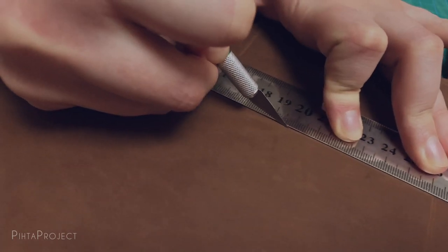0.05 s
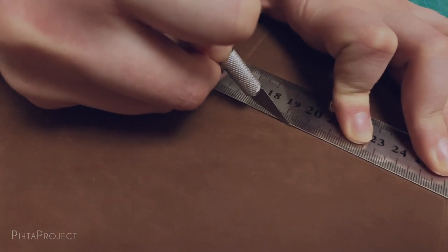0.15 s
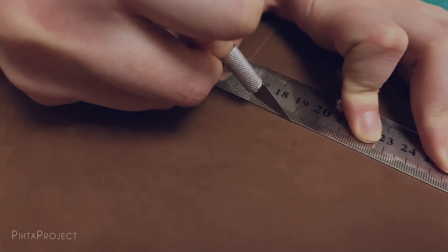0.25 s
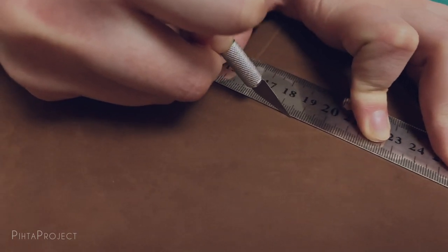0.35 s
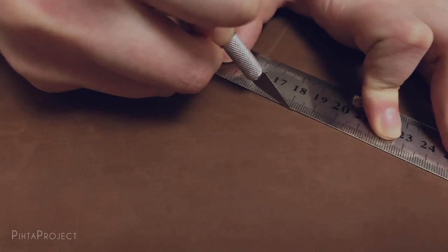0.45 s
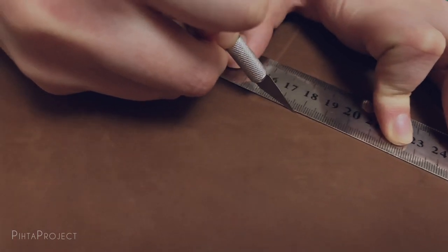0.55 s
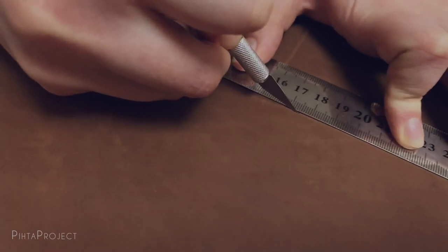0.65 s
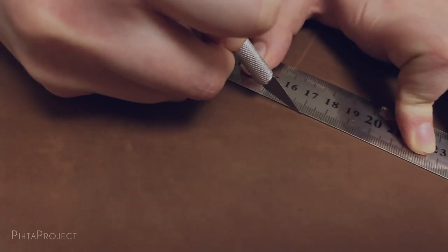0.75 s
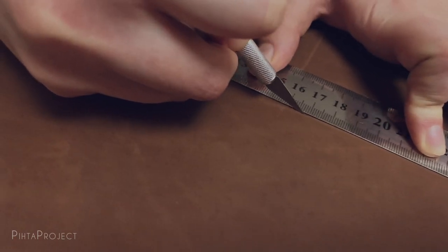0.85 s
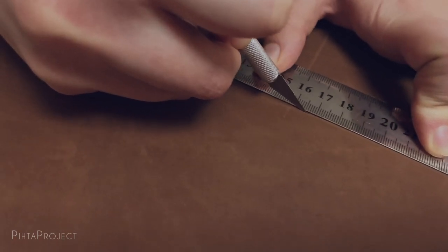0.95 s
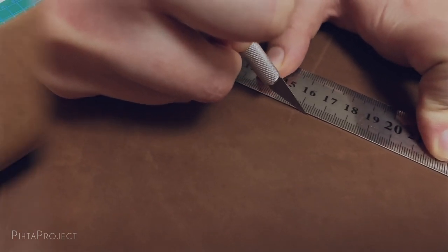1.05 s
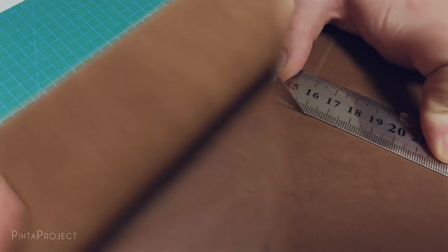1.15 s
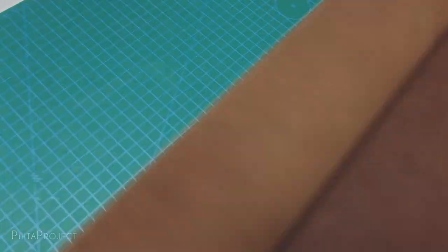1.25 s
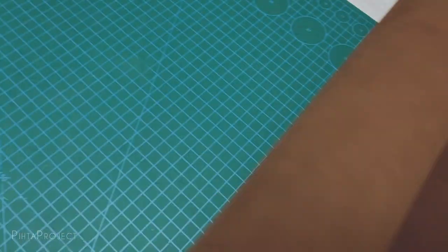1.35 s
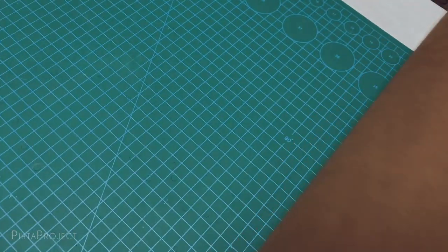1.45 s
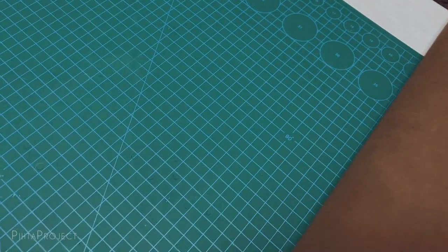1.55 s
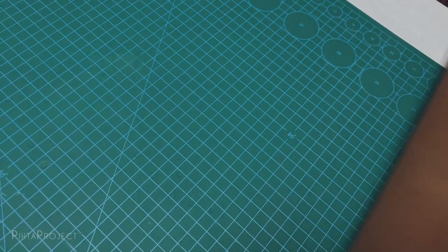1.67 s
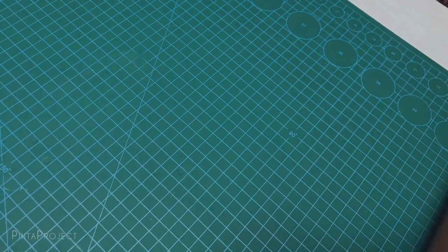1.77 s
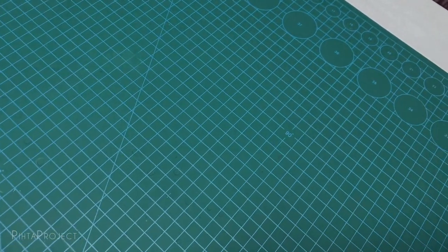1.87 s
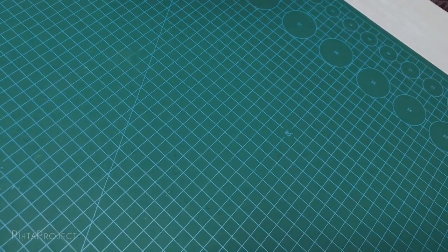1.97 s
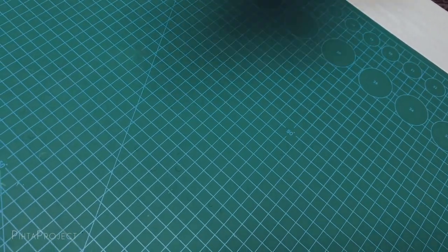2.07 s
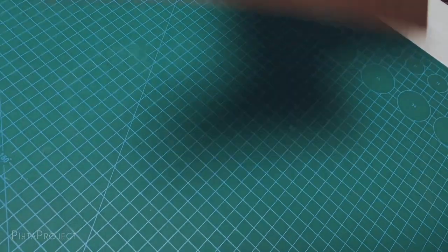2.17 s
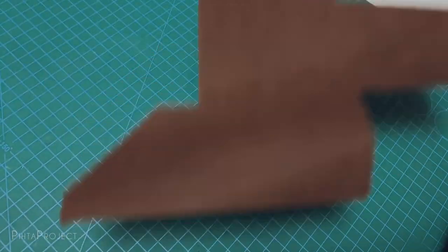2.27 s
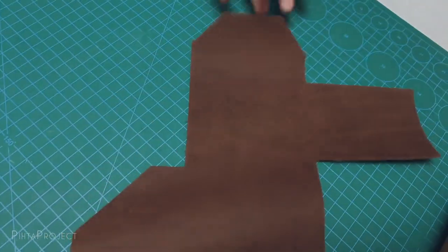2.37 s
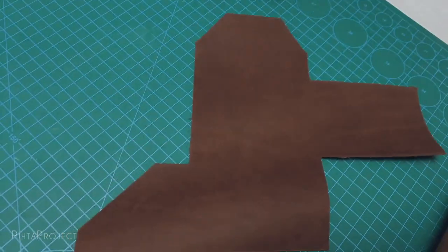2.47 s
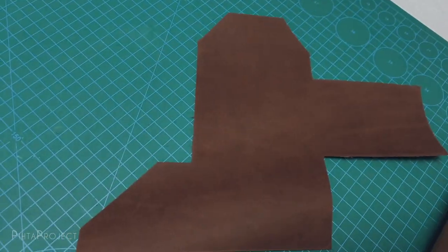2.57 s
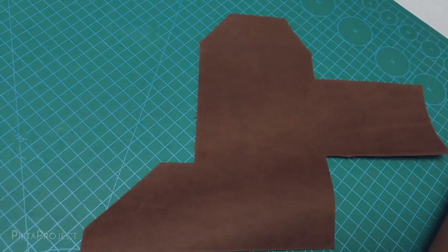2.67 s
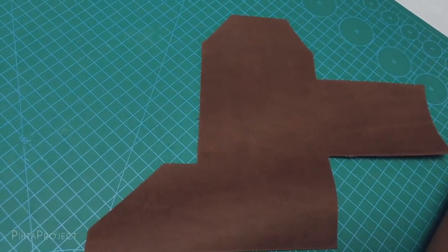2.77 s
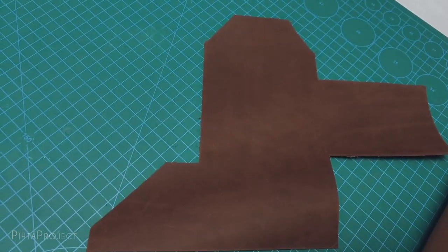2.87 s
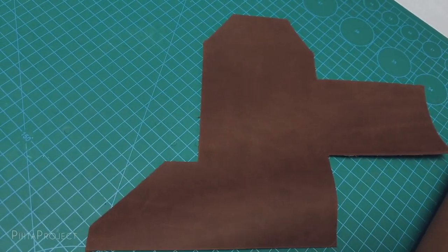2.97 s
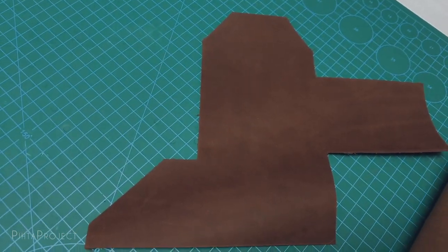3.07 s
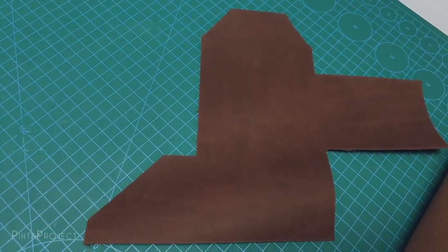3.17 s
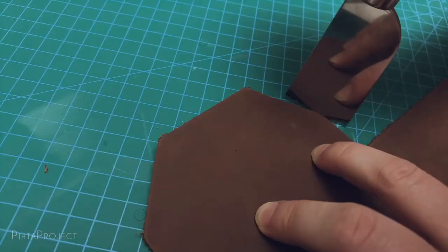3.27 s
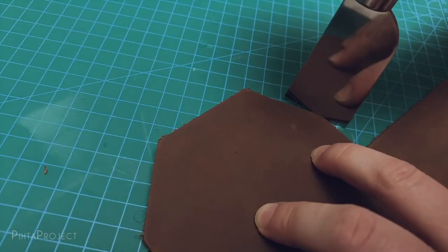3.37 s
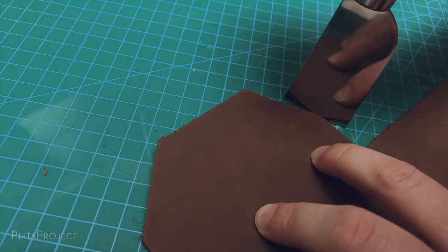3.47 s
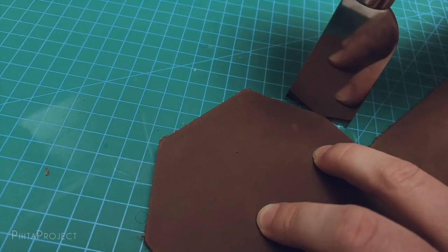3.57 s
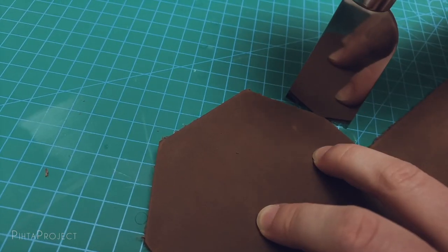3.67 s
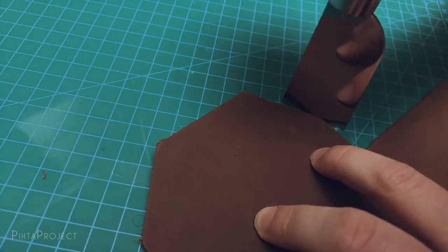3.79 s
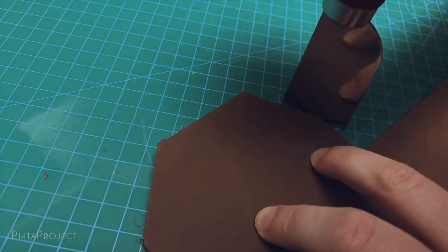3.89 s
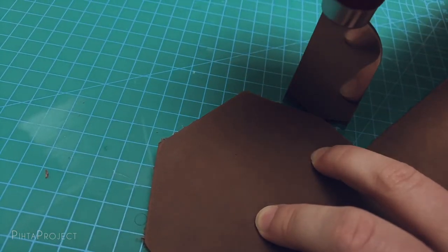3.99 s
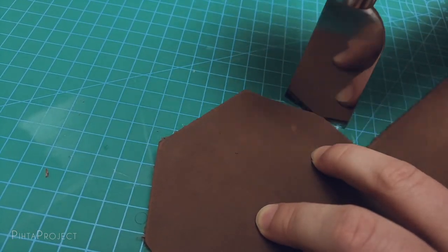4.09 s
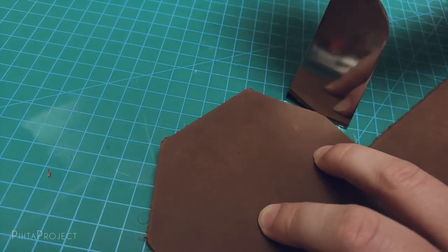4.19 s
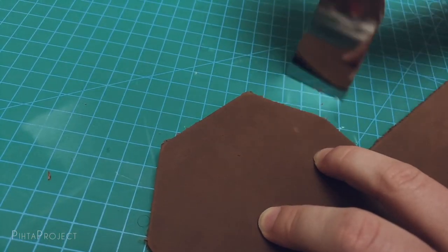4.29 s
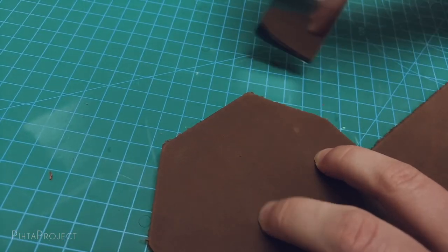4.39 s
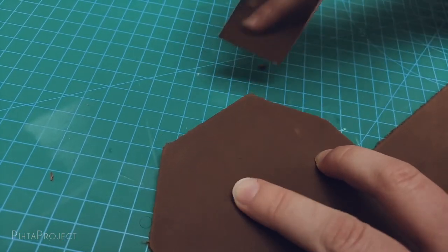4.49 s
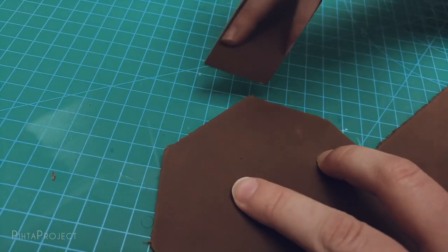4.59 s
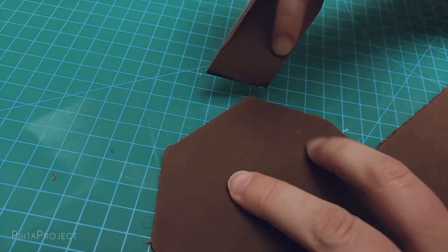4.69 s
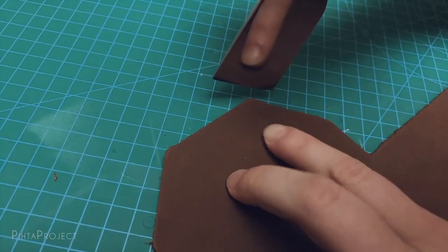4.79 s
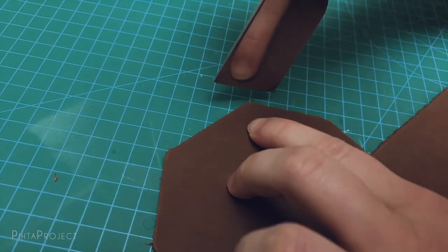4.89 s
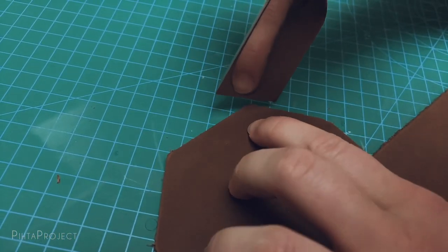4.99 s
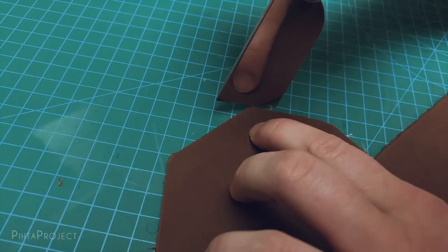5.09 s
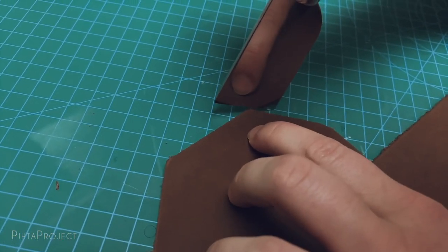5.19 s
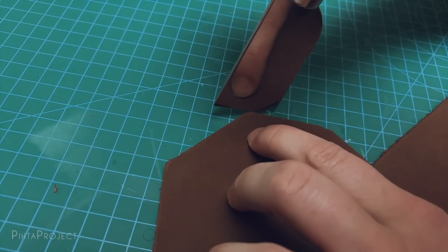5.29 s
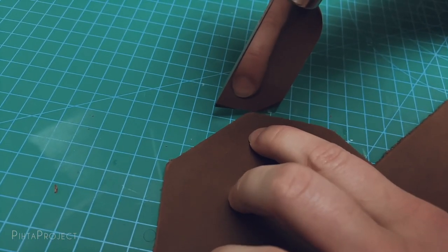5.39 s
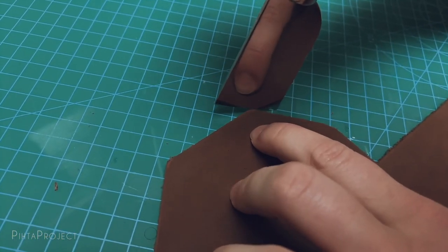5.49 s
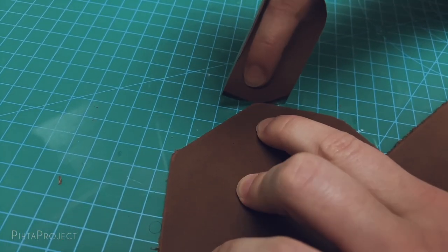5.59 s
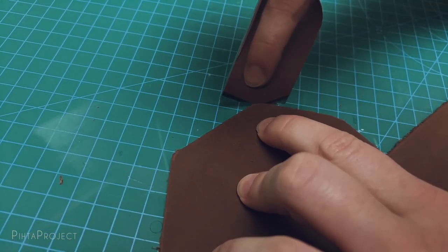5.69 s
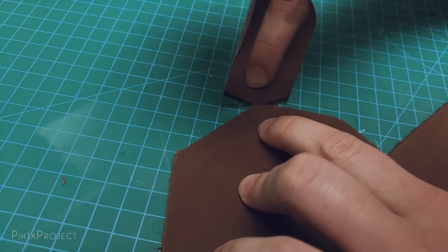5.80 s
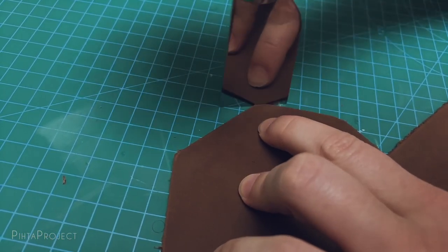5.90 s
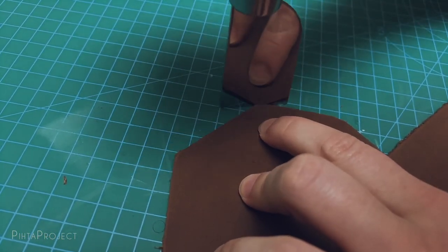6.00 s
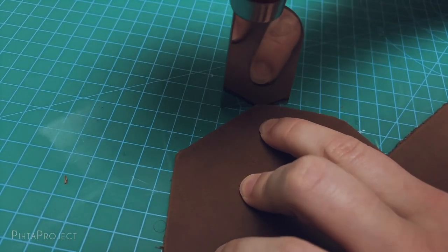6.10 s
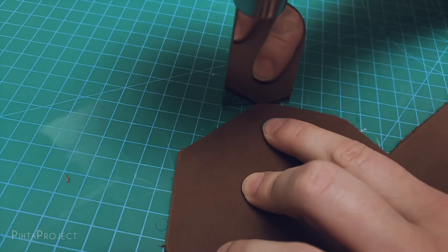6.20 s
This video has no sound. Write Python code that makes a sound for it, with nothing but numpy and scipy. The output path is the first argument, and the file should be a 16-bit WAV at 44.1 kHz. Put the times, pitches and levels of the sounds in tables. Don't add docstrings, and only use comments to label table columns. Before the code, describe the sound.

A knife scrapes grittily along a steel ruler through leather with tiny snaps, then leather flaps and drops on a mat, followed by short blade scrapes and finger rubs.

```python
import sys
import numpy as np
from scipy import signal
from scipy.fft import rfft, irfft
from scipy.io import wavfile
from scipy.ndimage import uniform_filter1d

SR = 44100
rng = np.random.default_rng(int(sys.argv[2]) if len(sys.argv) > 2 else 0)


def log_audio(samples):
    frames = np.atleast_2d(samples).T
    limited = np.clip(frames, -1, 1)
    pcm = np.round(limited * 32767).astype(np.int16)
    wavfile.write(sys.argv[1], SR, pcm)


def elevation(decibels):
    levels = np.asarray(decibels, float)
    return 10 ** (levels / 20)


N = 275625
T = np.arange(N) / SR


def evened(x):
    return x / np.sqrt(np.mean(x ** 2) + 1e-20)


def read(points, hz):
    f, value = np.transpose(points)
    return np.interp(np.log(hz + 1), np.log(f + 1), value)


def coloured(x, points):
    hz = np.fft.rfftfreq(len(x), 1 / SR)
    return evened(irfft(rfft(x) * elevation(read(points, hz)), len(x)))


def resonate(x, hz, width):
    turn = np.exp(2j * np.pi * np.cumsum(hz * np.ones(len(x))) / SR)
    r = np.exp(-np.pi * width / SR)
    return 2 * (turn * signal.lfilter([1 - r], [1, -r], x / turn)).real


def treble(x, hz):
    return signal.sosfilt(signal.butter(2, hz, "high", fs=SR, output="sos"), x)


def padded(x, count=4000):
    return np.pad(x, (0, count))


def columns(rows):
    s, *rest = np.transpose(rows)
    t = np.arange(s[0], s[-1], 1 / SR)
    return s[0], [np.interp(t, s, c) for c in rest]


def mixed(sounds):
    track = np.zeros(N)
    for s, sound in sounds:
        part = track[round(s * SR):][:len(sound)]
        part += sound[:len(part)]
    return track


def grit(count, per_s, spread_db, judder_db):
    hit, size, sign, grip = rng.random((SR, 4))[:count].T
    slips = (hit < per_s / SR) * elevation(-spread_db * np.log(size + 0.00088)) * np.sign(sign - 0.5)
    grip = uniform_filter1d(uniform_filter1d(grip - 0.5, size=300), size=200)
    return evened(slips * elevation(judder_db * evened(grip)))


def stray(count, share):
    every_s = 0.0698
    return 1 + share * np.interp(np.arange(count) / SR / every_s, np.arange(40), rng.standard_normal(40))


# t/s, extra force/dB
CATCHES = [(.004, 4.5), (.024, -0.5), (0.064, 4.5), (.08, 4), (.108, 4), (0.132, 11), (.149, 7), (0.169, 9),
           (.195, 5), (.221, 3), (0.228, 6), (.245, 3), (.266, 0), (0.287, 7), (.3, 5), (.345, 5),
           (.356, 4), (0.369, 6), (.388, 6), (.486, 5), (.498, 4.5), (.54, 6), (.553, 6.5), (0.57, -2),
           (.606, 5.5), (0.658, 5.5), (.676, 1), (.692, 1), (0.726, 7), (0.755, 5), (.785, -3), (.834, 10),
           (.875, 7), (.913, 3), (0.96, 11), (.98, 5), (1.006, 8), (1.03, 3), (1.088, 5), (1.106, 10),
           (1.154, 4), (3.687, 4.5), (3.71, 2.5), (3.72, -5), (3.729, -1.5), (3.735, 4), (3.762, 4),
           (4.217, -2), (4.227, 2), (4.248, 2), (4.258, -1), (5.82, 4), (5.83, -1), (5.838, 2.5),
           (5.851, 4), (5.859, 4.5), (5.877, 4), (5.888, 3.5), (5.904, 2.5)]


def catches():
    half_s = 0.0025
    return sum(db * np.exp(-((T - s) / half_s) ** 2) for s, db in CATCHES)


def scrape(rows, colour, modes, per_s, spread_db, judder_db, ring_db, wander=0):
    stiff_hz = 2600
    s, (level_db, hiss_db) = columns(rows)
    surge = catches()[round(s * SR):][:len(level_db)]
    level_db = level_db + surge
    hiss_db = hiss_db + 0.37 * surge
    force = grit(len(level_db), per_s, spread_db, judder_db)
    force = force + (elevation(hiss_db) - 1) * treble(force, hz=5600)
    force = padded(force * elevation(level_db) * signal.windows.tukey(len(force), 300 / len(force)))
    rings = 0
    for mode_hz, width, db in modes:
        hz = mode_hz * stray(len(force), wander * min(1, stiff_hz / mode_hz))
        rings = rings + elevation(db) * resonate(resonate(force, hz, width), hz, 3 * width)
    sound = coloured(force, colour) + elevation(ring_db) * evened(rings)
    return s, evened(sound) * np.sqrt(np.mean(padded(elevation(level_db)) ** 2))


# t/s, pressure/dB
DRAG = [(0, -49), (.15, -50), (.32, -48.5), (.4, -44.5), (.5, -47), (.53, -54.5), (.56, -46.5), (.72, -48),
        (.82, -53), (.9, -53), (.945, -60), (1.0, -55.5), (1.18, -55)]
HISS_FROM_DB = -48


def grip_curve(later):
    regrip_s, span_s, end_s = 0.53, 0.12, DRAG[-1][0]
    s = np.arange(regrip_s - span_s, end_s, 1 / 200) if later else np.arange(0, regrip_s + span_s, 1 / 200)
    db = np.interp(s, *np.transpose(DRAG))
    share = np.clip(0.5 + (s - regrip_s) / (2 * span_s), 0, 1)
    share = share if later else 1 - share
    hiss_db = np.maximum(db - HISS_FROM_DB, -7)
    return list(zip(s, db + 10 * np.log10(share + 1 / 1000), hiss_db))


# f/Hz, density/dB
DRAG_COLOUR = [(200, -22), (400, 3.5), (1000, 3.5), (2500, -2), (4000, -40), (7000, -37), (7600, -38),
               (10000, -28), (10700, -54), (15500, -60)]
# f/Hz, width/Hz, level/dB
RULER = [
    [(600, 43, 4.5), (1366, 125, 2.5), (1810, 350, -2.5), (2164, 260, 2.5), (2760, 480, -6),
     (3300, 470, -12), (3670, 240, -9), (4480, 380, -13), (5540, 320, -18), (6250, 450, -20.5),
     (8530, 590, -23), (9700, 440, -23)],
    [(620, 62, 12), (1300, 230, -8), (1850, 370, 2), (2800, 710, 2), (3360, 250, -13), (3830, 200, -11.5),
     (4800, 330, -8.5), (5500, 220, -20), (6500, 450, -16), (7600, 600, -15), (8500, 700, -13),
     (9650, 400, -14)],
]


def knife_drag():
    return mixed(scrape(grip_curve(later), DRAG_COLOUR, modes, per_s=6500, spread_db=3.0,
                        judder_db=1.1, ring_db=0, wander=0.035) for later, modes in enumerate(RULER))


def rumble():
    s, (db,) = columns(DRAG)
    spectrum = [(40, -10), (90, 16), (140, 12.0), (260, 3), (500, -45)]  # f/Hz, density/dB
    shake = coloured(rng.standard_normal(2 * SR)[:len(db)], spectrum)
    return mixed([(s, elevation(-52 + 0.8 * (db - HISS_FROM_DB)) * shake)])


# from/s, to/s, room tone/dB, sources/dB
CHANGES = [
    (1.3195, 1.354, -3, -60),
    (3.3353, 3.3682, -31, -60),
]
# f/Hz, density/dB
AIR = [(12, -56), (20, -21), (44, -2.5), (65, 0), (88, -8.5), (261, -7), (300, -14.5), (335, -9),
       (482, -14), (712, -19.5), (774, -17.5), (1240, -22), (1430, -23), (11000, -40.5), (15800, -48)]
AIR_DB = [-53.5, -57, -57]
# t/s, width/s, level/dB
STIRS = [(1.75, 0.27, 2), (3.8, 0.15, 6), (4.8, 0.31, 2), (6.05, 0.18, 2)]


def air():
    db = np.array(AIR_DB)[np.searchsorted([row[0] for row in CHANGES], T)]
    db = db + sum(lift * np.exp(-((T - s) / width) ** 2) for s, width, lift in STIRS)
    return elevation(db) * coloured(rng.standard_normal(N), AIR)


# f/Hz, t60/s
ROOM = [(100, 0.45), (400, 0.32), (1500, 0.27), (4000, 0.15), (10000, 0.13)]


def room(x):
    taps = np.zeros(SR // 2)
    at = np.arange(200, len(taps) - 20, 20)
    taps[at + rng.integers(0, 20, len(at))] = rng.choice([-1., 1.], len(at))
    hz, t, z = signal.stft(taps, SR, nperseg=256)
    tail = signal.istft(z * elevation(-60 * t / read(ROOM, hz)[:, None]), SR, nperseg=256)[1]
    return signal.fftconvolve(x, tail / np.linalg.norm(tail))[:N]


# f/Hz, level/dB, t60/s
DESK = [(127.3, -9.5, 0.3), (267, -6, 0.033), (330, -4, 0.089), (497, -2, 0.033), (690, -9, .04),
        (980, -7, 0.07), (1300, -2, 0.044), (1613, -6, 0.065), (1936, -7, .05), (2504, -16, 0.042)]
TICK_RATIO = [
    2.34,
    1.56,
    2.26,
]
TICK_S = [
    0.00016,
    0.00021,
    0.00012,
]
STRIP, LIMP, STEEL = 0, 1, 2


def tap(thing, s, db, hz, t60, tick_db):
    t, tick_hz = np.arange(SR // 4) / SR, TICK_RATIO[thing] * hz
    turns = np.cumsum(hz * (0.83 + 0.5 * np.exp(-t / 0.0016))) / SR
    ring = np.sin(2 * np.pi * turns) * elevation(-60 * t / max(t60, 0.002)) * (1 - np.exp(-t / 0.00065))
    tick = np.sin(2 * np.pi * tick_hz * t) * np.exp(-(t / TICK_S[thing] - 2) ** 2)
    crackle = resonate(rng.standard_normal(len(t)), 0.23 * tick_hz, 1900)
    crackle = evened(resonate(crackle, 0.36 * tick_hz, 2700))
    crackle = elevation(tick_db - 7.0) * crackle * np.exp(-t / 0.0025)
    desk = 0
    for f, mode_db, mode_t60 in DESK:
        phase = rng.uniform(0, 2 * np.pi)
        desk = desk + elevation(mode_db - 60 * t / mode_t60) * np.sin(2 * np.pi * f * t + phase)
    desk = elevation(-14.5) * desk * (1 - np.exp(-t / 0.0019))
    return s, elevation(db) * (1.5 * ring + elevation(tick_db) * tick + crackle + desk)


# t/s, peak/dB
SNAPS = [(.0795, -49), (0.1318, -35), (.169, -43), (.229, -38), (0.265, -38), (.287, -39), (0.365, -40.5),
         (.4848, -43), (.5525, -40), (.606, -39), (0.6584, -35), (.692, -44), (.7262, -34), (.7535, -39),
         (.8335, -42), (.9123, -49), (0.958, -42), (1.0065, -51), (1.0875, -45), (1.106, -52),
         (1.1535, -52)]


def fibre_snaps():
    return mixed(tap(STEEL, s, db, hz=2300 * rng.uniform(0.84, 1.21), t60=0.0069, tick_db=-7)
                 for s, db in SNAPS)


# centre t/s, peak/dB, f/Hz, half length/s
CLAPS = [(1.0315, -56, 10000, .0001), (1.0918, -49, 9500, .00012), (1.1056, -51, 8500, .0001),
         (1.154, -53, 9500, .00012), (1.2165, -28, 790, 0.0011), (1.2846, -24.5, 3000, 0.00031),
         (2.3556, -23, 2700, .0005), (2.3614, -21.5, 2950, .0005), (2.3838, -28, 700, 0.00067),
         (2.3588, -20, 1530, .0011), (2.3602, -9.5, 1780, .0009), (2.367, -21.5, 600, 0.00095),
         (2.3704, -16.5, 1490, 0.00047), (3.735, -30, 1710, .001), (3.756, -37, 5500, .0004),
         (4.7955, -31, 3580, 0.00022), (4.9995, -45, 2000, .00018), (5.1094, -42, 1500, 0.00053),
         (5.851, -29, 1370, 0.0016), (5.8595, -25.5, 1900, 0.00071), (5.8775, -26, 1400, 0.001),
         (5.9045, -25, 1600, 0.00067)]


def clap(s, db, hz, half):
    t = np.arange(-3 * half, 3 * half, 1 / SR)
    return s + t[0], elevation(db) * np.exp(-(t / half) ** 2) * np.cos(2 * np.pi * hz * t)


def air_claps():
    return mixed(clap(*row) for row in CLAPS)


def thump(s, db, hz, t60):
    t = np.arange(SR // 2) / SR
    rise_s = 0.003 + 0.35 / hz
    shape = np.sin(np.pi / 2 * np.minimum(t / rise_s, 1)) ** 2 * elevation(-60 * t / t60)
    return s, elevation(db) * shape / shape.max() * np.sin(2 * np.pi * hz * t)


# t/s, peak/dB, f/Hz, t60/s
THUMPS = [(1.189, -34, 424, .06), (1.196, -27.5, 357, 0.05), (1.204, -31.5, 793, 0.045),
          (1.208, -14, 362, 0.03), (1.2255, -16.5, 300, 0.033), (1.251, -28, 270, 0.046),
          (1.287, -30, 510, .028), (1.387, -32.5, 215, 0.14), (1.608, -19.5, 456, 0.068),
          (1.611, -27, 722, 0.093), (1.613, -23.5, 592, 0.031), (1.615, -19, 245.3, 0.094),
          (1.624, -23, 242, 0.1), (1.655, -31, 233, .09), (1.705, -36.5, 247, 0.15),
          (1.759, -52, 242, 0.082), (1.775, -50, 428, 0.055), (1.875, -51.5, 890, 0.047),
          (2.07, -58.5, 329, 0.43), (2.359, -29.5, 187, 0.086), (2.36, -23, 980, 0.044),
          (2.362, -39.5, 334, 0.3), (2.363, -31, 407, 0.046), (3.63, -31.5, 330, .02),
          (3.644, -35, 380, 0.02), (3.633, -41, 190, 0.067), (3.716, -33, 482, 0.049),
          (3.757, -29.5, 490, 0.031), (4.255, -23.5, 593, 0.068), (4.268, -33, 818, 0.15),
          (4.28, -37, 567, 0.084), (5.1094, -28.5, 194, 0.044), (5.111, -34, 403, 0.016),
          (5.119, -38, 280, 0.04), (5.18, -40, 197, 0.056)]


def leather_thumps():
    return mixed(thump(*row) for row in THUMPS)


# start t/s, length/s, level/dB, from f/Hz, to f/Hz, width/Hz
WHIFFS = [
    (1.195, 0.052, -49.5, 5500, 8000, 5000),
    (1.223, 0.055, -56.5, 8500, 8000, 4200),
    (4.797, 0.068, -57.5, 5170, 4800, 3000),
    (1.796, 0.053, -50, 1500, 3700, 800),
    (1.8, .035, -61, 3300, 3470, 600),
    (1.84, 0.046, -54, 2100, 3200, 900),
]


def whiff(start, length, db, from_hz, to_hz, width):
    u = np.arange(0, 1, 1 / (length * SR))
    hz = from_hz + (to_hz - from_hz) * u
    band = resonate(resonate(grit(len(u), 12000, 1.1, 1.5), hz, width), hz, 1.6 * width)
    soft_top = signal.butter(2, 10400, fs=SR, output="sos")
    band = evened(treble(signal.sosfilt(soft_top, band), hz=0.3 * from_hz))
    return start, elevation(db) * np.sin(np.pi * u ** 0.76) ** 1.1 * band


def whiffs():
    return mixed(whiff(*row) for row in WHIFFS)


# f/Hz, density/dB
SLIDE_COLOUR = [(900, -21), (1500, 6), (2500, 1), (4500, -4.5), (7000, -14), (11000, -21.5), (15500, -34)]
# f/Hz, density/dB
FLOP_COLOUR = [(100, -7), (250, 1.5), (400, 4), (800, -8), (1200, -6.5), (2200, -21), (5000, -68)]


def slide(rows):
    s, (level_db, hz, fizz_db, flop_db) = columns(rows)
    force = grit(len(hz), 9000, 1.6, 1.0)
    sound = coloured(force, SLIDE_COLOUR) + 0.8 * evened(resonate(resonate(force, hz, 1300), hz, 2400))
    sound = evened(sound) + (elevation(fizz_db) - 1) * treble(sound, hz=4330)
    flop = elevation(flop_db - 2) * coloured(force[::-1], FLOP_COLOUR) * np.minimum(np.arange(len(hz)) / 500, 1)
    return s, (elevation(level_db) * sound + flop) * signal.windows.tukey(len(hz), 300 / len(hz))


# start t/s, length/s, level/dB, fizz/dB, flop
# over rub/dB
SETTLES = [(1.203, 0.047, -44.5, 3, 16.5), (1.292, .03, -54, 2, 15), (1.304, 0.075, -54, 3, 20),
           (1.3494, 0.0087, -50.5, 19.5, -8), (1.384, .13, -57, 0.5, 18.5), (1.63, 0.22, -48, 3.5, 8.5),
           (2.371, 0.2, -53.5, 0, 10.5), (3.768, .13, -54.5, 2.5, 6), (4.273, 0.12, -55.5, 5, 13),
           (4.804, .1, -52, 6, -3), (5.115, 0.075, -77.5, 0.5, 30), (5.913, 0.076, -50.5, 8.5, 6)]


def settle(start, length, db, fizz_db, flop_db):
    hz, fade_db, flop_fade_db = 2300, -18.5, -5.5
    return [(start, db, hz, fizz_db, db + flop_db),
            (start + length, db + fade_db, hz, fizz_db, db + flop_db + fade_db + flop_fade_db)]


def settling():
    return mixed(slide(settle(*row)) for row in SETTLES)


# t/s, peak/dB, ring f/Hz, ring t60/s, tick rel/dB
FLAPS = [(1.2707, -30, 795, 0.0085, -11), (1.2841, -20.5, 1646, 0.011, -3.5),
         (1.2863, -28, 1060, 0.017, -15), (1.391, -27.5, 875, 0.0064, -15),
         (1.6036, -23.5, 1450, 0.021, 1.5), (1.6103, -28, 1550, 0.0046, 9), (1.612, -17.5, 980, 0.016, -18),
         (1.6198, -21, 1230, 0.012, 5)]


def strip_flaps():
    return mixed(tap(STRIP, *row) for row in FLAPS)


def change_scene(close, tone):
    for start, end, tone_db, close_db in CHANGES:
        inside = (T > start) & (T < end)
        close = np.where(inside, close * elevation(close_db), close)
        tone = np.where(inside, (tone - 0.8 * treble(tone, hz=700)) * elevation(tone_db), tone)
    return close, tone


# t/s, level/dB, fall/s
POP = (1.3542, -25, .0005)


def pop():
    s, db, fall = POP
    t = T[:400]
    return mixed([(s, -elevation(db) * np.exp(-t / fall) * np.minimum(t / 0.00014, 1))])


# t/s, peak/dB, f/Hz, t60/s
SHUDDERS = [(1.354, -42, 69.6, .12), (1.624, -32.5, 120, 0.11), (2.37, -41, 41.3, 0.44),
            (3.72, -49, 35.5, 0.36), (3.73, -38.5, 170.3, 0.12), (3.901, -45.5, 107, 0.086),
            (4.26, -42, 97, 0.27), (4.289, -40.5, 240, 0.076), (4.27, -44, 40, 0.27),
            (4.808, -39.5, 58, 0.045), (5.125, -36, 46, 0.25), (5.91, -41, 57, 0.13),
            (6.0, -45.5, 35.8, 0.6)]


def desk_shudders():
    return mixed(thump(*row) for row in SHUDDERS)


def rub(start, length, db, fizz_db, flop_db, from_hz=2530, to_hz=2530):
    up_s, down_s, ends_db = 0.015, 0.016, -11
    s = np.array([0, up_s, max(length - down_s, up_s), length])
    level = db + ends_db * np.array([1, 0, 0, 1])
    hz = from_hz + (to_hz - from_hz) * np.minimum(s / s[2], 1)
    return list(zip(start + s, level, hz, fizz_db + 0 * s, level + flop_db))


# start t/s, length/s, level/dB, fizz/dB, flop over rub/dB
RUBS = [(1.4, 0.033, -66, 13, 5), (1.646, 0.082, -54, 5.5, -5), (2.2, .14, -66, 8.5, 1),
        (2.931, 0.097, -71.5, 8.5, -6), (3.886, 0.089, -60, 4.5, 1), (4.654, 0.045, -62, 11, 1),
        (4.67, 0.14, -56.5, -1.5, -6.5), (4.792, .11, -57, 6, -3), (3.626, .05, -62.5, 0, 13)]


def finger_rubs():
    return mixed(slide(rub(*row)) for row in RUBS)


def glide(s, length, db, from_hz, to_hz):
    return slide(rub(s, length, db, 2.5, -4.5, from_hz, to_hz))


# start t/s, length/s, level/dB, from f/Hz, to f/Hz
SWISHES = [
    (1.795, 0.051, -51, 1800, 3300),
    (1.842, .055, -54, 2300, 3120),
]


def swishes():
    return mixed(glide(*row) for row in SWISHES)


# t/s, peak/dB, ring f/Hz, ring t60/s, tick rel/dB
DROP = [(2.3215, -38, 970, 0.016, -25), (2.3495, -30.5, 1430, 0.025, -2), (2.3535, -23.5, 1900, 0.0082, 4),
        (2.3566, -26, 1480, 0.0076, -9), (2.3598, -17.5, 1490, 0.0031, -5),
        (2.3613, -32, 1210, 0.0084, -13), (2.3642, -27, 2920, 0.0044, 1.2), (2.3645, -22, 1300, 0.0093, -5),
        (2.3694, -25, 1650, 0.012, -3), (2.382, -34, 1160, 0.006, -15)]


def limp_drop():
    return mixed(tap(LIMP, *row) for row in DROP)


# t/s, peak/dB, ring f/Hz, ring t60/s, tick rel/dB
NICKS = [(3.629, -36, 1450, 0.0085, -14), (3.643, -37, 1500, 0.0068, -4), (3.663, -44, 1510, 0.012, -2),
         (3.6977, -31, 3300, 0.0077, -10), (3.756, -28, 2300, 0.0033, -9), (4.6697, -45, 1300, 0.0087, -2),
         (4.795, -38, 2800, 0.005, -7), (4.9990, -44.5, 1250, 0.0091, -1), (5.11, -38.5, 800, 0.0094, -22)]


def blade_nicks():
    return mixed(tap(STEEL, *row) for row in NICKS)


def stroke(start, dig, hold, db, hiss_db, dig_db=-18, ring_db=0):
    lift_s, lift_db = 0.015, -14
    s = start + np.cumsum([0, dig, hold, lift_s])
    return list(zip(s, db + np.array([dig_db, 0, 0, lift_db]), hiss_db + ring_db * np.array([0, 0, 0, 1])))


# start t/s, dig-in/s, hold/s, level/dB, steel hiss/dB
SKIVES_CUT = [
    (3.677, 0.05, 0.028, -32, -3),
    (5.819, 0.028, 0.055, -33.5, -5.5),
]
# f/Hz, density/dB
SKIVE_COLOUR = [(100, -13.5), (200, -6.5), (500, -9.5), (1500, -3.5), (2400, -12.5), (3500, -19),
                (5500, -26.5), (8000, -28), (11500, -36.5), (13500, -36), (15500, -44)]
# f/Hz, width/Hz, level/dB
MAT = [(483, 195, 7.5), (766, 115, 8), (1280, 460, -5), (1630, 160, -5), (1900, 190, -11),
       (2900, 500, -6.5), (3220, 120, -20), (5500, 240, -21), (7500, 380, -24), (12600, 200, -32)]


def skives():
    return mixed(scrape(stroke(*row), SKIVE_COLOUR, MAT, per_s=6000, spread_db=2.0, judder_db=-0.1,
                        ring_db=-3.0, wander=0.045) for row in SKIVES_CUT)


# start t/s, dig-in/s, hold/s, level/dB, steel hiss/dB
SKATE_CUT = (4.206, .042, .012, -28.5, 1)
# f/Hz, density/dB
SKATE_COLOUR = [(88, -53), (150, -12.5), (607, -28), (948, -17.5), (1730, -7), (2100, -15.5), (3220, -16.5),
                (8170, -30), (9360, -31), (14300, -43), (15500, -44)]
# f/Hz, width/Hz, level/dB
BLADE = [(600, 280, 1), (760, 46, -13), (1810, 140, 2), (3200, 370, -7.5), (3900, 190, -11), (4290, 62, -5),
         (6400, 200, -19), (8870, 130, -7), (9400, 89, -3.5), (9400, 360, -13), (10000, 350, -16),
         (13400, 300, -20), (14130, 110, -11), (14000, 640, -21)]


def skate():
    rows = stroke(*SKATE_CUT, dig_db=-11, ring_db=7)
    return mixed([scrape(rows, SKATE_COLOUR, BLADE, per_s=9000, spread_db=2.4, judder_db=0.6,
                         ring_db=-1, wander=0.0015)])


# t/s, peak/dB, f/Hz, t60/s
SINGS = [
    (4.262, -47, 9430, .11),
    (4.262, -58, 14130, .11),
]


def blade_sings():
    return mixed(thump(*row) for row in SINGS)


# start t/s, length/s, level/dB, from f/Hz, to f/Hz
SCUFFS = [
    (4.386, 0.072, -48.5, 2450, 2800),
    (6.201, .1, -55, 2930, 2600),
]


def scuffs():
    sounds = []
    for row in SCUFFS:
        s, sound = glide(*row)
        cut_hz = 0.75 * row[3]
        sounds.append((s, treble(treble(sound, cut_hz), cut_hz)))
    return mixed(sounds)


# start t/s, length/s, level/dB, fizz/dB, flop over rub/dB
DULL_RUBS = [(4.469, .19, -63, 2, 0.63), (4.9, 0.19, -64.5, 4, 5.5), (5.57, 0.21, -79, 3, 4.8),
             (5.93, .175, -58, 3.5, 2.6), (6.109, 0.092, -68, -5, 3)]


def dull_rubs():
    return mixed(slide(rub(*row, from_hz=1450, to_hz=1450)) for row in DULL_RUBS)


def scene():
    rubs = knife_drag() + rumble() + whiffs() + settling() + finger_rubs() + swishes()
    rubs += skives() + skate() + scuffs() + dull_rubs()
    blows = fibre_snaps() + leather_thumps() + strip_flaps() + desk_shudders()
    blows += limp_drop() + blade_nicks() + blade_sings()
    slaps = air_claps()
    echoes = room(elevation(-16.0) * slaps + elevation(-15) * rubs + elevation(-13.5) * blows)
    close, tone = change_scene(rubs + blows + slaps + echoes, air())
    return (close + pop() + tone)[None]


def roll_off(x):
    return signal.sosfilt(signal.butter(12, 15920, fs=SR, output="sos"), x)


def record(dry):
    edge = signal.firwin(255, 15900, fs=SR)
    mix = signal.oaconvolve(dry, edge[None], "same")
    return roll_off(mix)


dry = scene()
out = record(dry)
log_audio(out)
```